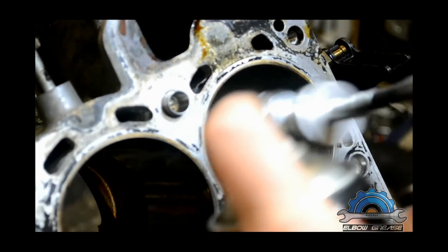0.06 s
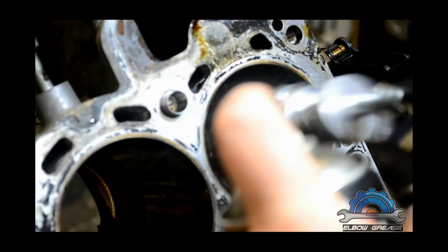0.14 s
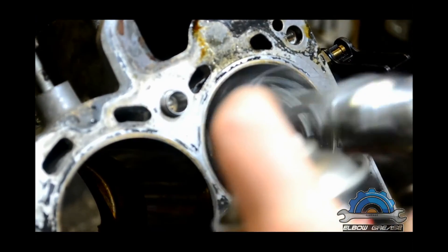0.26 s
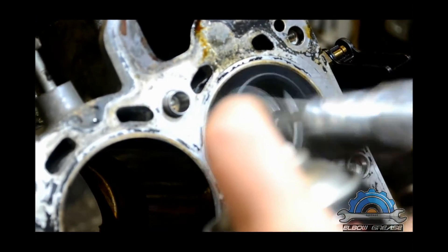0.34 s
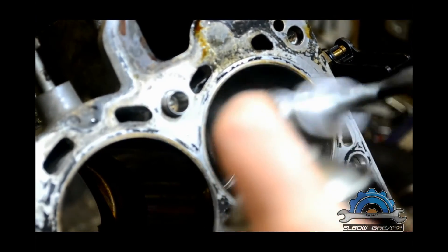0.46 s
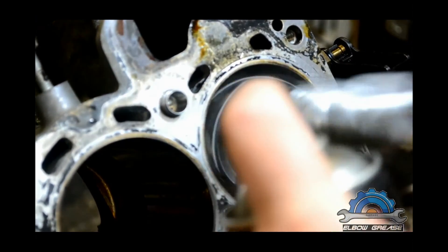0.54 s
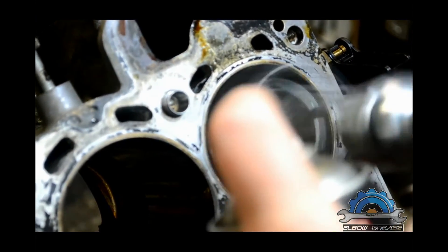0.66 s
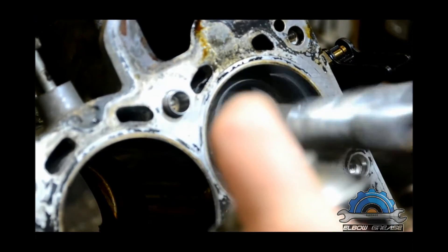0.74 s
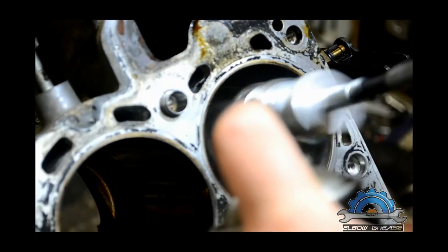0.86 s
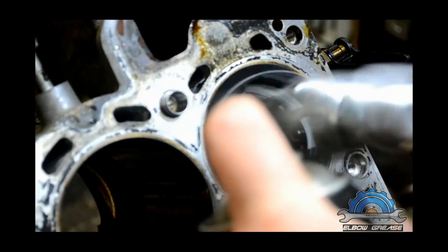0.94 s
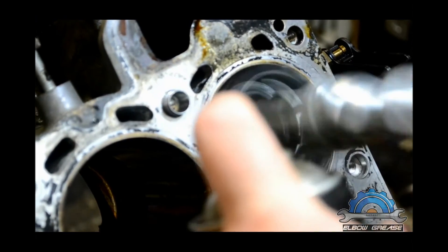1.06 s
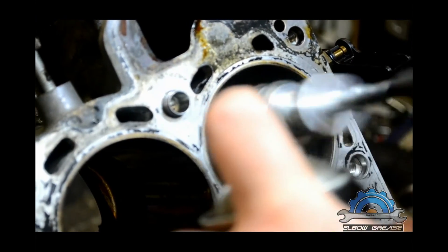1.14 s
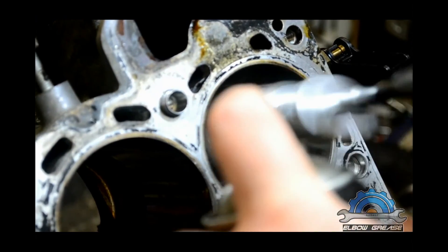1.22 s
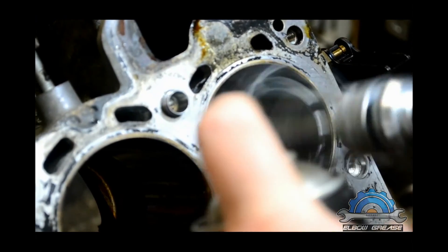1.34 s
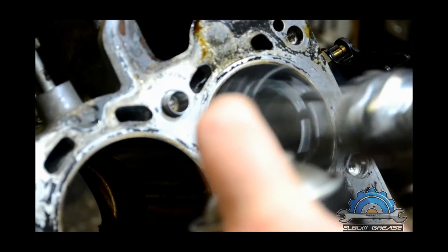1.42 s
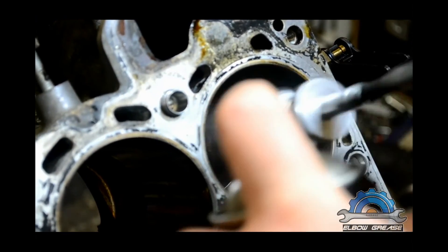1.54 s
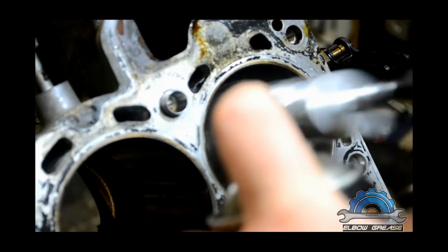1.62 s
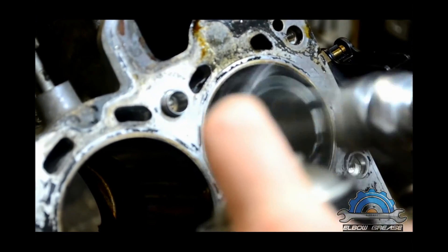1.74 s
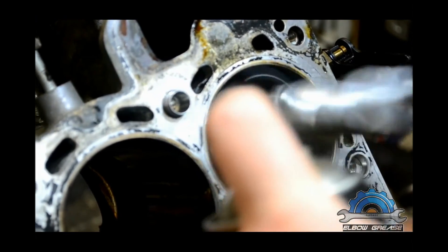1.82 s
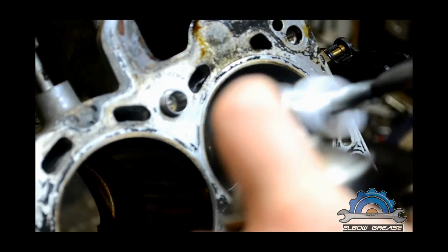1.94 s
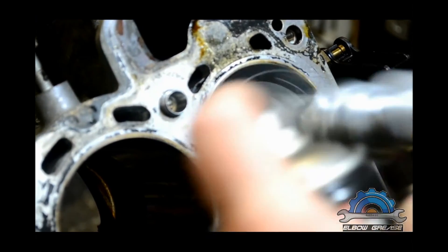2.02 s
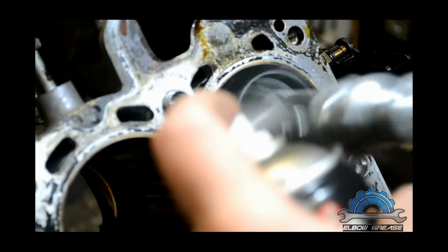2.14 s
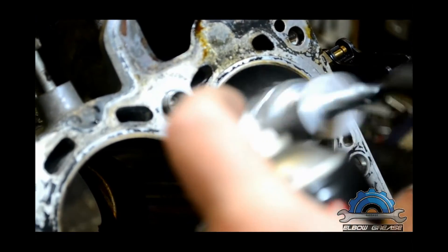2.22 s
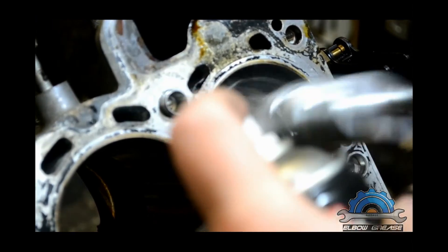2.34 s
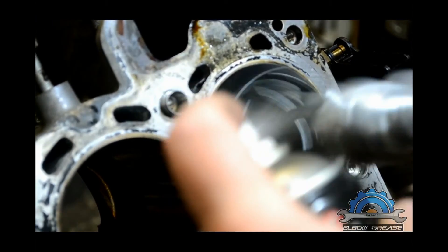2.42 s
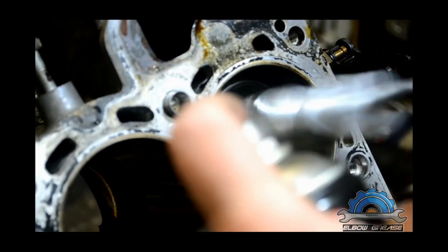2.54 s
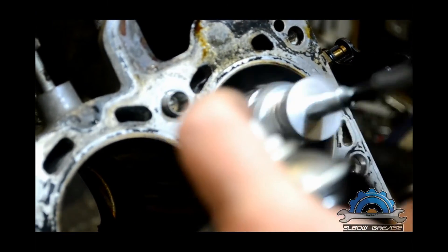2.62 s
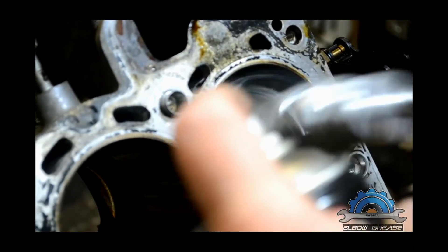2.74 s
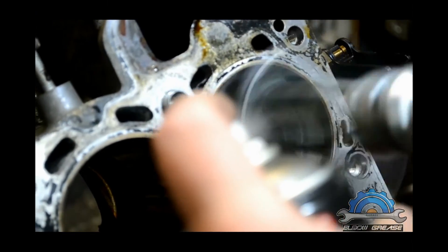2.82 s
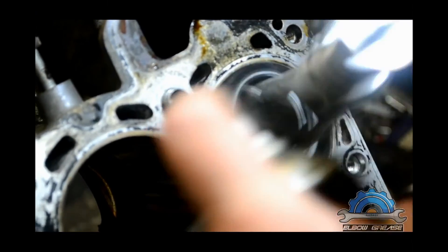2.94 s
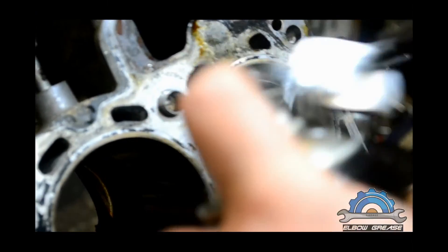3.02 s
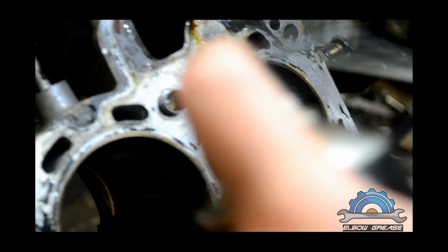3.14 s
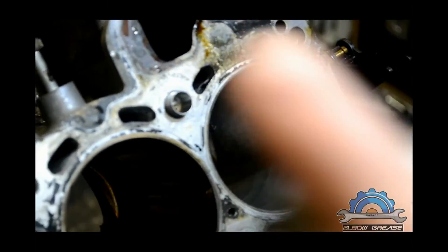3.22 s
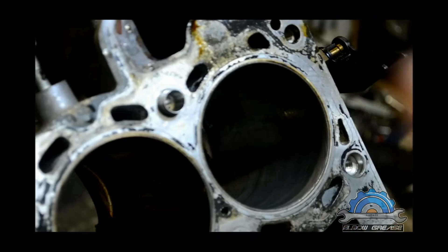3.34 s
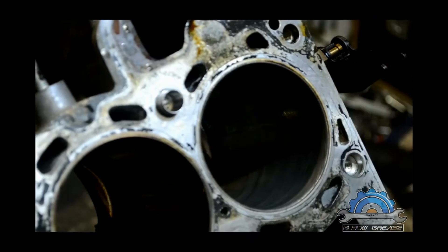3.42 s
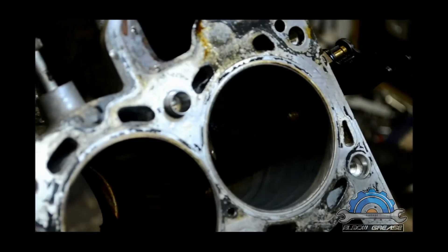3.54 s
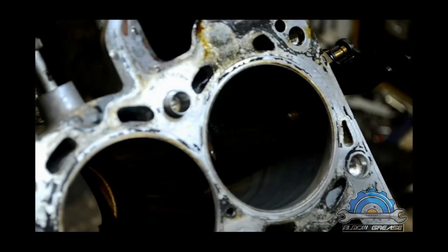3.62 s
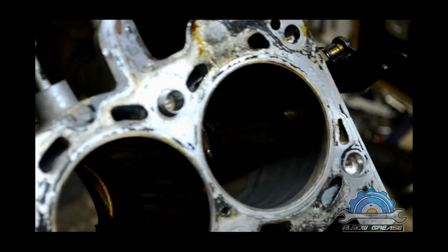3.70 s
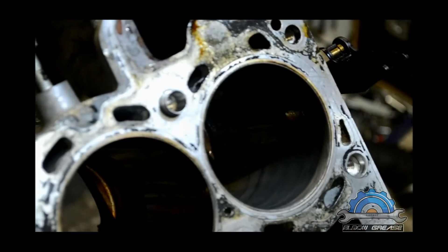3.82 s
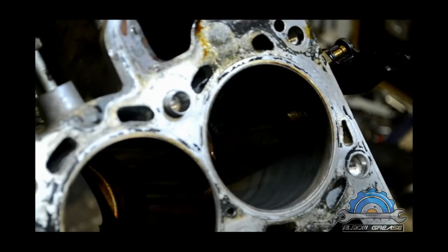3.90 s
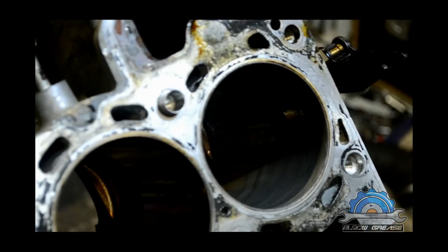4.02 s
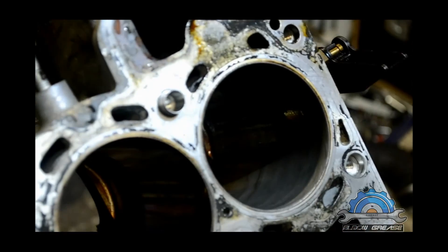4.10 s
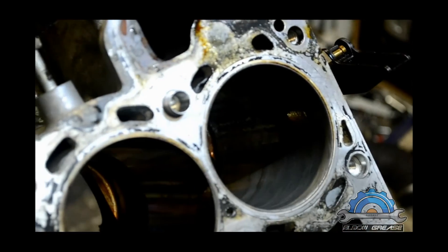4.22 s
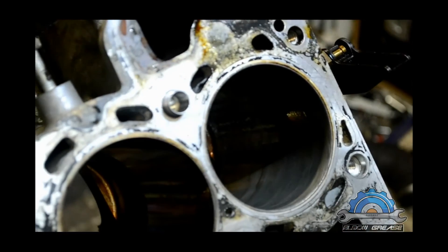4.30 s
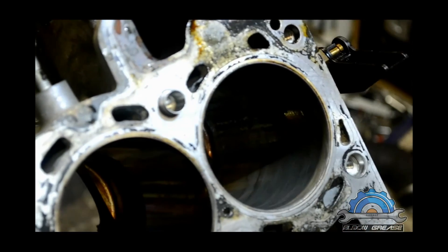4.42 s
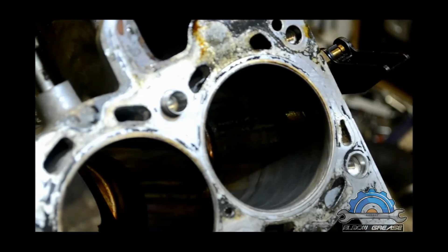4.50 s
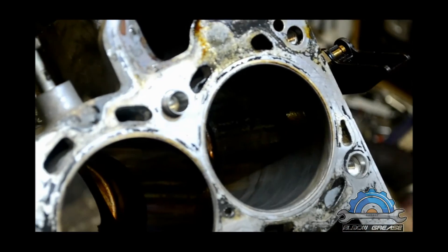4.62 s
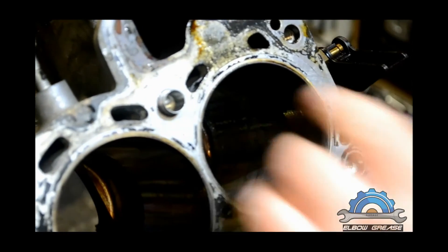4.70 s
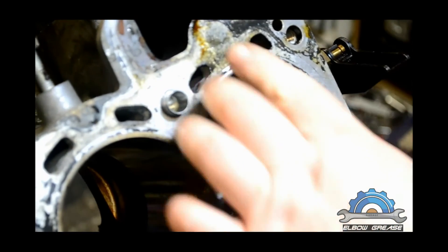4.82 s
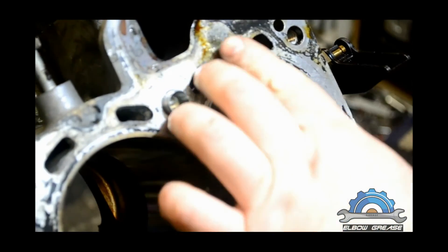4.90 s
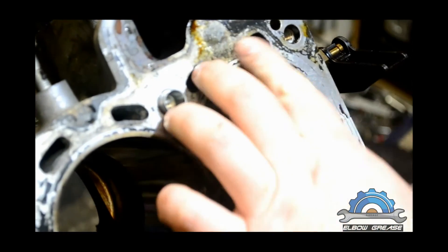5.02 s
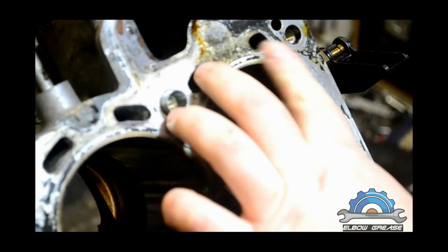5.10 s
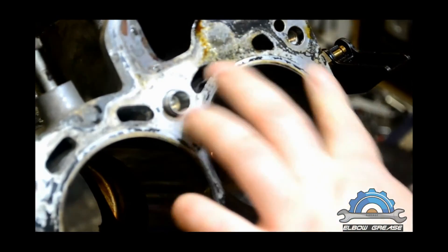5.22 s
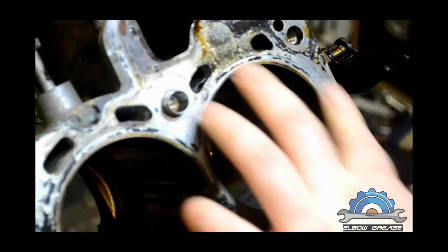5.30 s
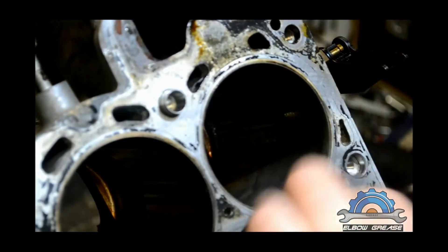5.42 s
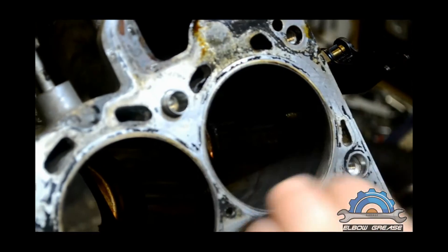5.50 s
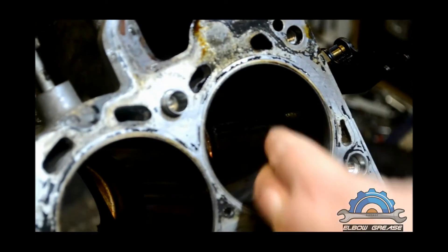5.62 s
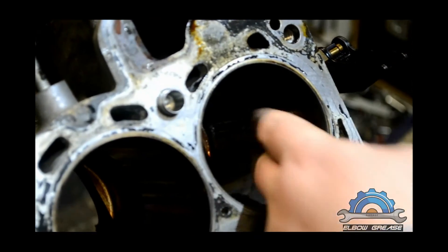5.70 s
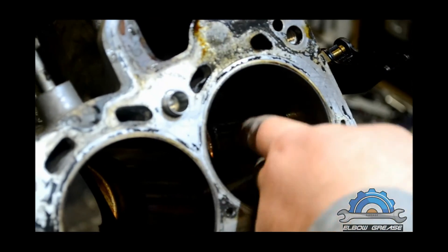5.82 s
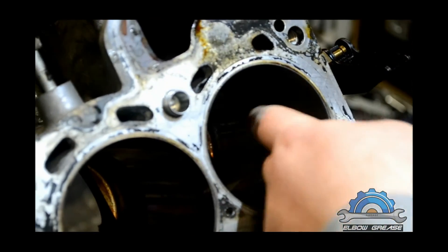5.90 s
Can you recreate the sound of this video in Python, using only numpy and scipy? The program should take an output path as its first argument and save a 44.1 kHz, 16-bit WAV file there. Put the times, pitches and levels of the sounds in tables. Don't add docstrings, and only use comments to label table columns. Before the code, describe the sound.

Close in a garage, an electric drill holds a high, slightly fluttering whine while abrasive stones scrape up and down an engine cylinder, hissing and making the block ring about three times a second. Near three seconds the hone rattles and squeaks out over the rim. Small metal clicks follow as the tool is put down, then a quiet room with distant rumble, low hum and a faint hand wipe.

```python
import sys
import numpy as np
from scipy import signal
from scipy.fft import rfft, irfft, next_fast_len
from scipy.io import wavfile
from scipy.ndimage import uniform_filter1d, map_coordinates

SR = 44100
rng = np.random.default_rng(int(sys.argv[2]) if len(sys.argv) > 2 else 0)


def voltage_ratio(decibels):
    exponent = np.asarray(decibels, float) / 20
    return 10 ** exponent


def generate_wav(signal):
    frames = np.transpose(np.atleast_2d(signal))
    scaled = np.clip(frames, -1, 1) * 32767
    pcm = np.round(scaled).astype(np.int16)
    wavfile.write(sys.argv[1], SR, pcm)


N = 262519

# t/s, gear tone before, at and after the turn f/Hz, f/Hz, f/Hz
TURNS = [
    (-.1, 2520, 2440, 2505),
    (.25, 2522, 2434, 2500),
    (.603, 2532, 2412, 2497),
    (.962, 2503, 2416, 2515),
    (1.33, 2532, 2434, 2522),
    (1.68, 2528, 2448, 2503),
    (2.045, 2527, 2452, 2495),
    (2.405, 2548, 2456, 2524),
    (2.76, 2535, 2440, 2500),
]
# t/s, half length/s, drop/dB
SLACKS = [(0, .02, 4), (.06, .025, 3), (.115, .03, 5), (.28, .06, 5), (.485, .03, 8), (.52, .03, 3),
          (.645, .05, 6), (.82, .03, 3), (.89, .03, 3), (1.02, .05, 5), (1.21, .07, 6), (1.36, .03, 4),
          (1.57, .05, 5), (1.73, .03, 7), (1.93, .07, 3), (2.1, .03, 7), (2.18, .03, 6), (2.29, .05, 10),
          (2.32, .03, 12), (2.37, .03, 3), (2.47, .05, 2), (2.56, .03, 2.5), (2.675, .055, 14),
          (2.78, .04, 6)]
# multiple of the main tone, level/dB, phase drift/(rad/s)
GEAR_TONES = [(0.0788, -40.5, 50), (0.237, -33, 51.5), (.397, -24.5, 13), (0.4464, -24, 65),
              (.666, -22.5, 70), (.951, -35, 68), (1.049, -28, 59), (2.002, -19.5, 130)]
# t/s, grit level/dB
PRESSURE = [
    (0, -29.5),
    (2.67, -29),
    (2.72, -29.5),
    (2.88, -25.5),
    (3.01, -30),
    (3.06, -32.5),
    (3.12, -34.5),
    (3.222, -56.5),
    (3.3, -55),
]
# f/Hz, level/dB
GRIT = [(150, -61), (250, -28.5), (357, -18), (873, -16), (1130, -10), (1450, -11), (2070, -10),
        (2450, -4.5), (2780, -16.5), (4210, -9), (5560, -12.5), (10000, -11.5), (13000, -41), (22000, -120)]
# f/Hz, width/Hz, level/dB
LOW_RING = [(1510, 40, -10), (1582, 19, 0), (1683, 38, -12)]
MID_RING = [(2113, 25, -13), (2207, 28, -2), (2305, 28, -11)]
HIGH_RING = [(3882, 45, -11), (4105, 60, -1), (4316, 24, -6)]
# f/Hz, width/Hz, level/dB
BROAD_RING = [(5077, 120, -6), (6840, 240, -11), (8620, 560, -7)]
THIN_RING = [(754, 25, -11), (1120, 28, -3), (1190, 25, -6), (2908, 35, -6), (3273, 40, -5), (3558, 40, -8),
             (6690, 30, -4), (9607, 25, -1)]
# t/s, level/dB
LOW_BITES = [(0.246, -29), (.525, -38), (.633, -32), (.861, -38.5), (.934, -33), (1.007, -38.5),
             (1.138, -40), (1.302, -34), (1.667, -31.5), (1.76, -37), (2.034, -29.5), (2.358, -33),
             (2.466, -33.5), (2.747, -28), (2.921, -33.5), (3.05, -35)]
MID_BITES = [(.139, -34.5), (.223, -30.5), (.552, -32), (.69, -36.5), (.887, -37), (.96, -30), (1.15, -40),
             (1.241, -31), (1.309, -30), (1.375, -46), (1.597, -38), (1.677, -33), (2.045, -34),
             (2.118, -34), (2.418, -34), (2.619, -42), (2.741, -30), (2.836, -27.5), (2.87, -34),
             (3.0, -41)]
HIGH_BITES = [(.087, -32), (.162, -32), (.218, -32), (.276, -30.5), (.512, -33.5), (.605, -31.5),
              (.651, -34.5), (.872, -33), (.954, -28.5), (1.02, -33.5), (1.058, -42), (1.209, -36.5),
              (1.296, -31.5), (1.507, -35), (1.599, -38.5), (1.668, -31), (1.73, -32.5), (2.012, -32.5),
              (2.273, -34), (2.335, -36), (2.422, -29), (2.508, -32.5), (2.717, -34.5), (2.785, -32),
              (2.843, -29), (3.06, -38)]
NEIGHBOURS_DB = (-3.5, -2.5, -3.5)
WANDER_HZ = (11, 14, 34)
# t/s, peak level/dB, ring f/Hz, thud level/dB
CLANKS = [(2.716, -10, 6960, -21.5), (2.721, -6, 5300, -24.5), (2.725, -5, 7000, -19),
          (2.7316, -6, 9420, -11.5), (2.7374, -16, 7040, -13.5), (2.7701, -3, 5080, -19.5),
          (2.78, -11, 6920, -12), (2.79, -13.5, 6500, -24.5), (2.8058, -3, 9270, -17.5),
          (2.8125, -7, 8370, -6.5), (2.8244, -6, 4570, -14.5), (2.833, -13, 8800, -29.5),
          (2.842, -14.5, 6180, -16.5), (2.853, -14.5, 5500, -25), (2.8687, -11.5, 6630, -19),
          (2.873, -10, 7500, -29.5), (2.8768, -4, 6100, -33), (2.8812, -11, 9400, -22),
          (2.893, -3, 6680, -22), (2.896, -0.5, 5190, -28), (2.9012, -8, 8710, -25),
          (2.908, -11.5, 6000, -25), (2.92, -14, 7500, -28), (3.0295, -5, 5350, -27.5),
          (3.035, -6.5, 4500, -34.5), (3.0388, -1, 6840, -24.5), (3.0477, -6.5, 6120, -12),
          (3.055, -13, 7000, -20), (3.068, -19, 6000, -27.5), (3.087, -11.5, 5920, -32.5),
          (3.0953, -10, 7210, -31), (3.0998, -3.5, 8000, -20.5), (3.132, -15.5, 6200, -28),
          (3.14, -15.5, 7640, -33)]
# t/s, peak level/dB, ring f/Hz, thud level/dB
CATCHES = [
    (0.227, -7, 4900, -22),
    (.953, -9.5, 3930, -9.5),
    (1.109, -12.5, 6580, -31),
    (1.548, -9.5, 3500, -29),
    (1.552, -13.5, 6870, -29),
    (2.417, -11, 4185, -28.5),
]
# f/Hz, width/Hz, level/dB
DECK = [(328, 14, 4.5), (514, 15, 3.5), (765, 43, 2), (1167, 210, -5)]
# t/s, length/s, f/Hz, level/dB
SQUEAKS = [(2.719, 0.036, 1579, -23), (2.735, 0.024, 2458, -24.5), (2.778, 0.016, 4110, -29),
           (2.808, 0.011, 1170, -31), (2.828, 0.05, 2106, -28.5), (2.809, 0.11, 2900, -33),
           (2.837, 0.016, 4090, -25), (2.879, 0.0082, 4140, -19.5), (2.91, 0.034, 1565, -26.5),
           (2.955, 0.034, 4280, -31.5), (3.001, 0.02, 4060, -29.5), (3.04, 0.034, 4030, -22.5),
           (3.058, 0.013, 2480, -26.5), (3.049, 0.03, 1582, -36.5)]
# t/s, peak level/dB, ring f/Hz, body level/dB, knock level/dB
CLICKS = [(3.18, -28, 4900, -19, -30), (3.1965, -22, 6100, -29, -24), (3.2, -20, 5000, -29, -26),
          (3.2155, -35, 6400, -25, -25), (3.2372, -30, 8200, -23, -11), (3.25, -37, 4750, -20, -17),
          (3.2824, -36, 5800, -4, -10), (3.284, -41, 6100, -12, -10), (3.2957, -39, 6150, 4, -26),
          (3.329, -33, 9300, -18, -12), (3.332, -37, 6100, -18, -15), (3.3543, -34, 6230, -19, -15),
          (3.3575, -32, 5800, -14, -14.5), (3.381, -36, 6000, -15, -16), (3.3704, -33, 6380, -20, -11),
          (3.4511, -36.5, 6500, -19, -18), (3.8608, -32.5, 6700, -20, -21), (3.864, -27.5, 6870, -17, -20),
          (3.8754, -36, 7200, -3, -23), (3.932, -38.5, 6440, -8, -11), (4.1838, -53.5, 3170, -12, 8.5),
          (4.2316, -36.5, 5940, -9, -14), (4.2574, -34, 5100, -7, -20), (4.272, -32, 8500, -14, -28),
          (4.2754, -29.5, 6450, -22, -17), (4.2775, -29, 9550, -30, -20), (4.277, -23.5, 6160, -15, -27),
          (4.281, -37, 5500, -24, -24), (4.285, -41, 6300, -22, -18), (4.2925, -31, 6550, -7, -14),
          (4.301, -42, 5000, -11, -20), (4.3114, -28.5, 9520, -9, -26), (5.4505, -64, 8340, -13, -6)]
# t/s, length/s, level/dB
STROKES = [(3.2, 0.05, -48.5), (3.28, 0.02, -54), (3.336, 0.0091, -47.5), (3.357, 0.023, -50),
           (3.46, .02, -61), (4.28, .04, -53), (3.988, 0.091, -65.5), (4.129, 0.13, -68.5),
           (4.302, 0.35, -76), (4.931, 0.091, -73), (5.036, 0.12, -69), (5.174, 0.095, -65),
           (5.453, 0.033, -72), (5.697, 0.0093, -76), (5.758, 0.32, -59.5)]
# f/Hz, level/dB
SKIN = [(1470, -26), (2500, 1.5), (3080, -5.5), (4240, -2.5), (4600, -2.5), (7020, -4), (8020, -1.5),
        (10000, -2.5), (13000, -37), (22000, -120)]
# start t/s, end t/s
RUB_S = (4.93, 5.5)
# t/s, level/dB
PASSES = [
    (3.3, -54.5),
    (4.47, -53),
    (4.63, -50),
    (4.82, -57),
    (5.12, -52.5),
    (5.4, -53.5),
    (5.65, -58),
]
# f/Hz, level/dB
RUMBLE = [(100, -46.5), (170, -13), (300, 3.5), (500, -2.5), (900, -9), (1500, -36.5), (3000, -76),
          (9000, -120), (20000, -120)]
# t/s, level/dB
SWELLS = [(.08, -61), (.3, -62), (.5, -62), (.85, -60), (1.14, -63.5), (1.65, -65), (2.0, -59),
          (2.399, -61.5), (2.77, -59.5), (3.28, -55.5), (3.52, -60), (4.2, -60.5), (4.63, -62), (5.02, -63),
          (5.36, -57), (5.6, -60), (5.76, -62.5)]
# f/Hz, level/dB
AIR = [(12, -46.5), (24, -23.5), (54, -7), (108, -5.5), (202, 1), (349, -2.5), (652, -5), (1320, -9),
       (2460, -18.5), (2660, -15.5), (3360, -23), (10000, -36.5), (13000, -45), (22000, -120)]
# f/Hz, time/s
GARAGE = [(300, 0.49), (3000, 0.23), (10000, 0.096)]
# f/Hz, level/dB
MIC = [(20, 0), (7400, 2.5), (7880, -3), (8500, 2), (10400, 0.5), (11000, -12), (11800, -27.5),
       (13500, -25), (15700, -33), (16000, -91)]


def gears():
    hz = mesh_hz()
    slack_s, half_s, drop_db = np.transpose(SLACKS)
    db = -22.5 - 10 * np.log10(1 + (2 * (hz - 2512) / 66) ** 2)
    db -= peaks(slack_s, drop_db, (drop_db / half_s)[:, None], 0)
    phase = 2 * np.pi * np.cumsum(hz + 9 * wobble(40)) / SR
    whine = voltage_ratio(db + 1 + 1.5 * wobble(35)) * np.sin(phase)
    for multiple, tone_db, loose in GEAR_TONES:
        drift = np.cumsum(loose * wobble(60)) / SR
        level = voltage_ratio(0.5 * (db + 22.5) - 19 + tone_db + 2.5 * wobble(20))
        whine += level * np.sin(multiple * phase + drift)
    return whine * fade(2.74, 0.06)


def mesh_hz():
    slow_s, dwell_s, recover_s = 0.115, 0.018, 0.095
    knots = []
    for s, before, at_turn, after in TURNS:
        knots += [(s - slow_s, before), (s - dwell_s, at_turn)]
        knots += [(s + dwell_s, at_turn), (s + recover_s, after)]
    return uniform_filter1d(curve(knots), size=700)


def stones():
    grit_db = curve(PRESSURE)
    low_db = peaks(*np.transpose(LOW_BITES), 201.5, grit_db - 18.5)
    mid_db = peaks(*np.transpose(MID_BITES), 222.5, grit_db - 18)
    high_db = peaks(*np.transpose(HIGH_BITES), 179, grit_db - 9.5)
    grit_db = grit_db + 0.08 * (np.maximum(low_db, high_db) - grit_db + 12) + 0.21 * wobble(22)

    out = voltage_ratio(grit_db + 3) * coloured(scratch(), GRIT)
    out += voltage_ratio(grit_db - 5.5) * unit(ringing(scratch(), BROAD_RING + THIN_RING))
    rings = zip((low_db, mid_db, high_db), (LOW_RING, MID_RING, HIGH_RING), NEIGHBOURS_DB, WANDER_HZ)
    for db, modes, beside_db, stray_hz in rings:
        centre = modes[1][0]
        phase = 2 * np.pi * np.cumsum(centre + stray_hz * wobble(70)) / SR
        main = unit(voltage_ratio(3.5 * wobble(40)) * np.sin(phase))
        beside = unit(ringing(ringing(scratch(), modes), [(centre, 600, 0)]))
        out += voltage_ratio(db - 2.2) * (main + voltage_ratio(beside_db) * beside)
    return out * fade(3.2, 0.033)


def scratch():
    clumps_db = 1.0 * wobble(400) + 0.82 * wobble(170) + 1.1 * wobble(45) + 0.16 * wobble(14)
    return voltage_ratio(clumps_db) * rng.standard_normal(N)


def rim():
    out, blows, thuds = np.zeros(N + SR), np.zeros(N), np.zeros(N)
    t = np.arange(SR // 8) / SR
    for s, db, hz, thud_db in CLANKS + CATCHES:
        at = round((s + 0.0006) * SR)
        noise = rng.standard_normal(len(t))
        decay = 0.24 * voltage_ratio(-60 * t / 0.016) + 0.12 * voltage_ratio(-60 * t / 0.094)
        spray = (bright(noise) + 0.76 * noise) * decay
        ring = 0.58 * np.sin(2 * np.pi * hz * t) * voltage_ratio(-60 * t / 0.011) * (1 - np.exp(-t / 0.000292))
        out[at:][:len(t)] += voltage_ratio(db - 6.5) * (spray + ring)
        push = np.sign(noise[0])
        blows[at] = push * voltage_ratio(db + 11)
        thuds[at] = push * voltage_ratio(db + thud_db + 28)
    struck = out[:N] + ringing(blows, LOW_RING + MID_RING + HIGH_RING) + ringing(thuds, DECK)
    return filtered(struck, lambda hz: hz ** 2 / (hz ** 2 + 200 ** 2))


def squeaks():
    out, t = np.zeros(N), np.arange(N) / SR
    sway = np.cumsum(170 * wobble(200)) / SR
    flutter = voltage_ratio(3 * wobble(200))
    for s, length, hz, db in SQUEAKS:
        span = slice(round(s * SR), round((s + 0.15) * SR))
        u = t[span] - s
        shape = np.clip(u / 0.0021, 0, 1) * voltage_ratio(-60 * np.clip(u - length, 0, 1) / 0.052)
        out[span] += voltage_ratio(db - 1.5) * shape * flutter[span] * np.sin(2 * np.pi * hz * u + sway[span])
    return out


def clicks():
    out, t = np.zeros(N + SR), np.arange(SR // 10) / SR
    for s, db, hz, body_db, knock_db in CLICKS:
        sharp, dull = rng.standard_normal((2, len(t)))
        ring = 0.97 * np.sin(2 * np.pi * hz * t) * voltage_ratio(-60 * t / 0.0035)
        body = np.sin(2 * np.pi * 2850 * t) * voltage_ratio(body_db - 1 - 60 * t / 0.011)
        tick = 0.16 * (bright(sharp) + 0.34 * sharp) * voltage_ratio(-60 * t / 0.0145)
        dull = uniform_filter1d(dull, size=12) - uniform_filter1d(dull, size=90)
        knock = dull * voltage_ratio(knock_db + 11 - 60 * t / 0.018)
        onset = 1 - np.exp(-t / 0.00019)
        out[round((s + 0.0006) * SR):][:len(t)] += voltage_ratio(db) * (ring + body + tick + knock) * onset
    return out[:N]


def wiping_hand():
    wipe = voltage_ratio(touch_db() - 0.6 + 0.8 * wobble(30)) * coloured(rng.standard_normal(N), SKIN)
    palm = fade(RUB_S[1], 0.05) - fade(RUB_S[0], 0.05)
    ring = ringing(wipe, [(3300, 70, -6), (4130, 45, 7), (4200, 2000, -12)])
    return wipe + voltage_ratio(12) * palm * ring


def touch_db():
    t = np.arange(N) / SR
    db = np.full(N, -86.0)
    for s, length, top_db in STROKES:
        landing = 500 * np.clip(s - t, 0, None)
        lifting = 600 * np.clip(t - s - length, 0, None)
        db = np.maximum(db, top_db - landing - lifting)
    return db


def far_rumble():
    db = peaks(*np.transpose(PASSES), 25, -75)
    return voltage_ratio(db - 5 + 1.2 * wobble(14)) * coloured(rng.standard_normal(N), RUMBLE)


def hum():
    db = peaks(*np.transpose(SWELLS), 69, -74.5)
    source = ringing(rng.standard_normal(N), [(63.8, 30, 0)])
    return voltage_ratio(db - 1.5) * singing(source, [(52, 20, -13), (65, 11, -2.5)], steady=0.47)


def trill():
    db = -77.5 + 1.5 * wobble(4.7)
    tone = singing(rng.standard_normal(N), [(2600, 30, -18.5), (2690, 29.4, -3)], steady=0.4)
    return voltage_ratio(db + 1.5 + 6.1 * wobble(32)) * tone


def still_air():
    return voltage_ratio(-58) * coloured(rng.standard_normal(N), AIR)


def garage(x):
    hz, t, z = signal.stft(rng.standard_normal(SR // 2), SR, nperseg=256)
    decay = voltage_ratio(-60 * t / along(GARAGE, hz)[:, None])
    tail = signal.istft(z * decay, SR, nperseg=256)[1]
    return signal.fftconvolve(np.pad(x, (200, 0)), tail / np.linalg.norm(tail))[:N]


def unit(x):
    return x / np.sqrt(np.mean(x ** 2) + 1e-20)


def along(points, hz):
    f, v = np.transpose(points)
    return np.interp(np.log(hz + 1), np.log(f + 1), v)


def curve(rows):
    s, value = np.transpose(rows)
    return np.interp(np.arange(N) / SR, s, value)


def peaks(times, tops, slope, rest):
    t = np.arange(0, N + 64, 64) / SR
    away = np.abs(t - np.array(times)[:, None])
    db = np.max(np.array(tops)[:, None] - slope * away, axis=0)
    return np.maximum(np.interp(np.arange(N) / SR, t, db), rest)


def wobble(rate):
    at = np.arange(0, N + 16, 16)
    knots = rng.standard_normal(int(N * rate / SR) + 5)
    return np.interp(np.arange(N), at, map_coordinates(knots, [at * rate / SR]))


def fade(stop_s, length_s):
    return np.clip((stop_s - np.arange(N) / SR) / length_s + 1, 0, 1)


def filtered(x, response):
    m = next_fast_len(N + SR // 2)
    return irfft(rfft(x, m) * response(np.fft.rfftfreq(m, 1 / SR)), m)[:N]


def coloured(x, spectrum):
    return unit(filtered(x, lambda hz: voltage_ratio(along(spectrum[:-2], hz))))


def ringing(x, modes):
    def response(f):
        total = 0
        for k, (centre, width, db) in enumerate(modes):
            damping = 1j * f * width
            total = total + (-1) ** k * voltage_ratio(db) * damping / (centre * centre - f * f + damping)
        return total
    return filtered(x, response)


def singing(x, modes, steady):
    ring = ringing(ringing(x, modes), [(modes[1][0], 500, 0)])
    size = np.sqrt(np.abs(uniform_filter1d(ring ** 2, size=1300)) + 1e-12)
    return unit(ring / size ** steady)


def bright(noise):
    return noise - np.roll(noise, 3)


def scene():
    hone = stones() + rim() + squeaks()
    small = clicks()
    echo = garage(voltage_ratio(-10) * hone + voltage_ratio(-6) * small)
    background = wiping_hand() + far_rumble() + hum() + trill() + still_air()
    mono = gears() + hone + small + echo + background
    return np.array([mono, mono])


def top_cut(x):
    return signal.sosfilt(signal.butter(12, 15750, fs=SR, output="sos"), x)


def record(dry):
    heard = filtered(dry[0], lambda hz: voltage_ratio(along(MIC, hz)))
    heard = heard / (1 + np.abs(heard / 0.57) ** 4) ** (1 / 4)
    return top_cut(np.array([heard, heard]))


dry = scene()
out = record(dry)
generate_wav(out)
```